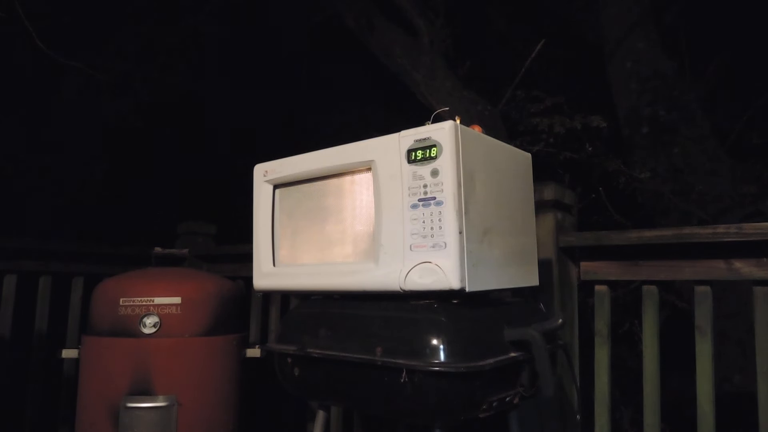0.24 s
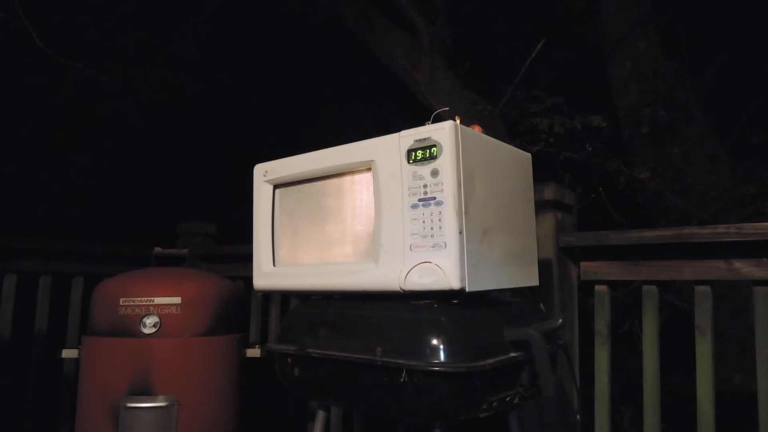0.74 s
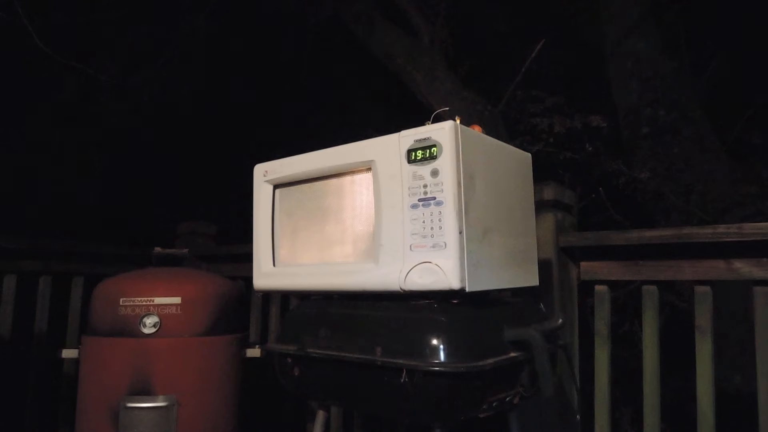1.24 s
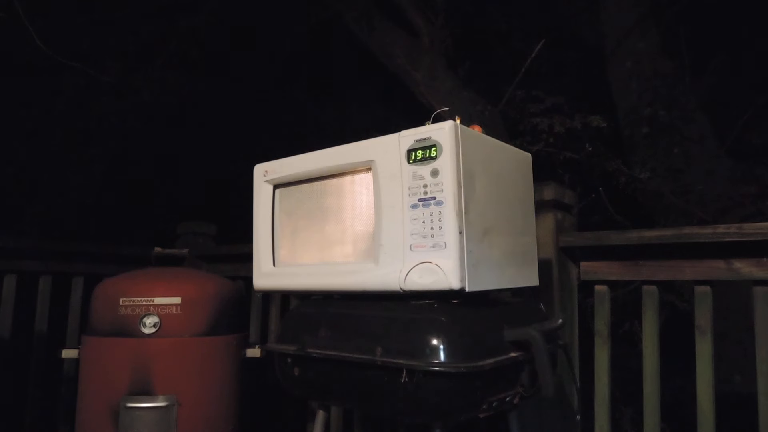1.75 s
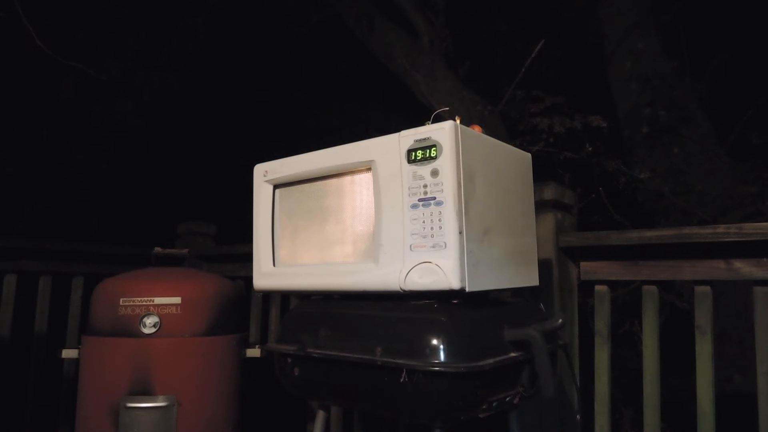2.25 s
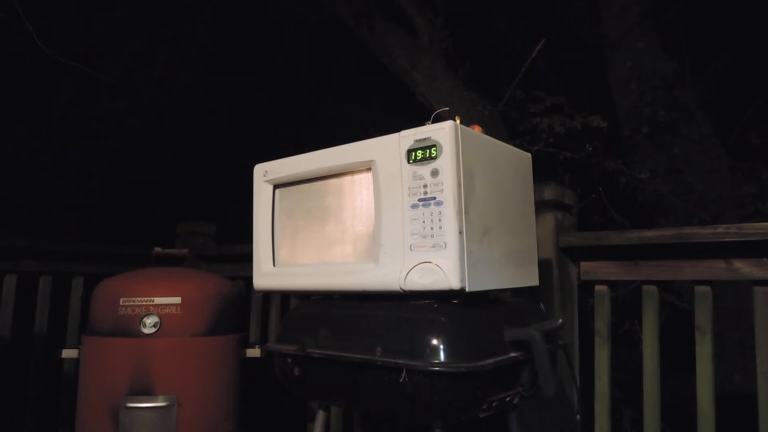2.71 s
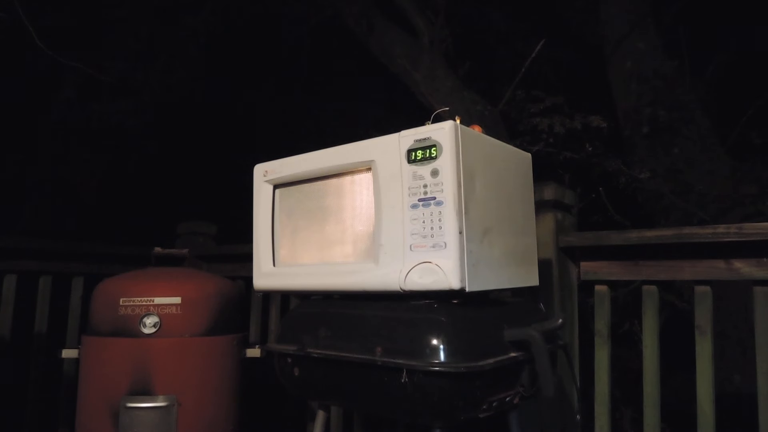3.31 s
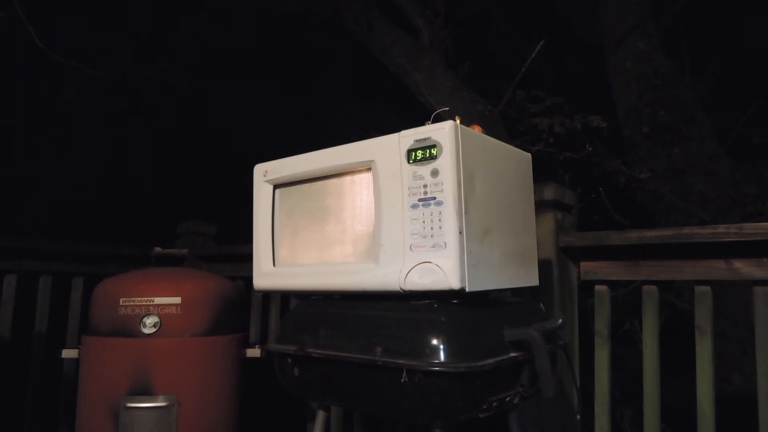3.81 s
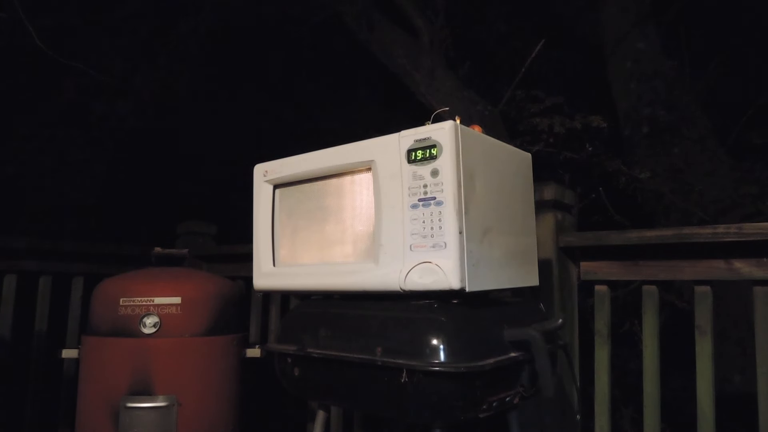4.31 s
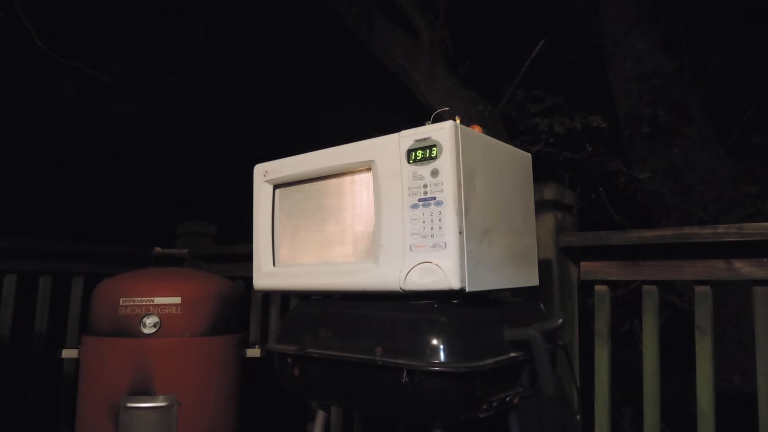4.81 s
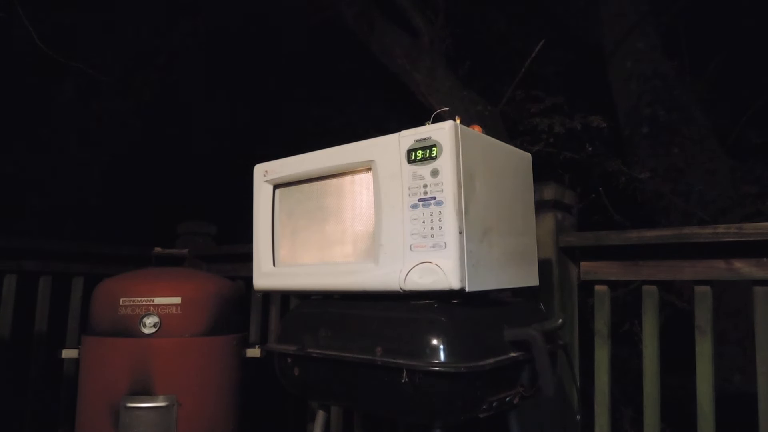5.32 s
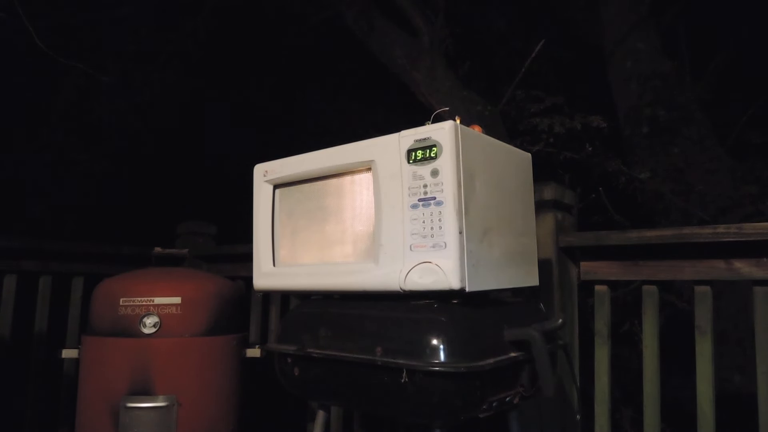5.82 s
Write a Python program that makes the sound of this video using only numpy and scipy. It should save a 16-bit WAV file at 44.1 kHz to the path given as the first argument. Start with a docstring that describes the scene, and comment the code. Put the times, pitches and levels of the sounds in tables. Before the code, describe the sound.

A microwave oven runs on an outdoor deck at night, heard straight ahead for the whole six seconds. The main sound is a deep, steady electrical hum that wavers slightly in loudness, topped by a thin buzz and a faint, fine chatter from the steel case. The cooling fan whirs and blows a soft, hollow rush of air through the vents. From about 0.6 seconds, roughly every three quarters of a second, the fan's tone throbs gently while the high chatter dips a little. At about 3.1 seconds there is one soft, low thump that dies away quickly. At about 3.8 seconds the turntable gives a single tiny, faint, high squeak. The oven carries on at the same level to the end. A low outdoor rumble and a faint, wide hiss lie under everything.

```python
"""A deep hum, a thin buzz and a rush of air: a microwave oven runs on an outdoor deck at night.
Its transformer flexes with the mains, the steel case chatters in time, and the cooling fan whirs and
blows through the vents. The chatter sags in a slow cycle, probably as a part goes round; the fan
tones throb at the same rate, like two close tones beating. The rubbing turntable squeaks once.
Under it all lie a low outdoor rumble, a faint hiss and one soft thump."""
import sys
import numpy as np
from scipy.fft import rfft, irfft, next_fast_len
from scipy.io import wavfile
from scipy.ndimage import map_coordinates

SR = 44100
rng = np.random.default_rng(int(sys.argv[2]) if len(sys.argv) > 2 else 0)


def store_pcm(level_fs):
    """Save levels as 16-bit WAV."""
    pcm = np.round(np.clip(level_fs, -1, 1) * 32767).astype(np.int16)
    wavfile.write(sys.argv[1], SR, np.atleast_2d(pcm).T)


N = 266937

MAINS_HZ, TOP_HZ = 59.977, 15800


def transformer(shake, flicker_db=1.27, flicker_rate=18, waver_db=1, split_hz=1500):
    """Magnetostriction: the core flexes twice a mains cycle, giving a deep hum and a buzz of harmonics."""
    # chance rises and dips in loudness where the steady hum mixes with low noise: time_s, level_db
    hum_levels = [(0.0, -40), (0.29, -38.5), (0.4, -37), (1.08, -41.5), (1.37, -38), (1.48, -43),
                  (1.92, -37), (2.15, -42.0), (2.56, -39.0), (3.18, -43.0), (3.32, -37), (3.43, -41.0),
                  (4.86, -38.5), (5.0, -41), (5.41, -38), (5.52, -43.5), (5.63, -38.0), (6.05, -42.5)]
    # harmonics that the case radiates best: mains_multiple, level_db
    overtones = [(3, -59), (6, -51), (10, -62), (32, -74), (33, -78), (40, -76), (41, -72), (42, -77),
                 (44, -76), (45, -80), (48, -79), (49, -79), (52, -79), (54, -76), (55, -75), (56, -76),
                 (58, -77), (60, -77), (61, -79), (63, -72), (65, -74), (69, -75), (75, -81), (79, -83)]
    # envelope about which the weaker harmonics scatter: frequency_hz, level_db
    buzz_envelope = [(60, -75), (900, -75), (2000, -84), (3500, -82), (5000, -91), (7500, -97),
                     (11000, -100), (15500, -110)]
    hum_db = curves(hum_levels)[0] + flicker_db * wobble(flicker_rate)
    hum = amp(hum_db) * np.sqrt(2) * np.sin(2 * np.pi * 2 * MAINS_HZ * clock())
    multiples, strong_db = np.transpose(overtones)
    strong = np.round(multiples).astype(int)
    weak = np.setdiff1d(np.arange(3, int(TOP_HZ / MAINS_HZ)), strong)
    weak_db = along(buzz_envelope, weak * MAINS_HZ) + rng.uniform(-6, 5, len(weak))
    weak_db -= 3 * (weak % 2)  # odd harmonics are fainter
    buzz = mains_harmonics(strong, strong_db, smear_rad=2.26)
    buzz += mains_harmonics(weak, weak_db, smear_rad=1.8)
    low_buzz = filtered(buzz, lambda hz: hz < split_hz)
    waver = unit(amp(waver_db * wobble(13)))
    return hum + low_buzz + (buzz - low_buzz) * shake * waver  # the treble follows the shaking case


def mains_harmonics(orders, db, smear_rad, size=8192):
    """Fourier synthesis: a stereo wave locked to the mains, each harmonic's phase smeared by the case."""
    phase, lead = rng.standard_normal((2, len(orders)))
    apart = np.sign(lead) * np.arctan(orders * MAINS_HZ / 19000)  # channels part more at high pitch
    spectrum = np.zeros((2, size // 2 + 1), complex)
    spectrum[:, orders] = amp(db) * np.exp(1j * (smear_rad * phase + np.array([apart, -apart])))
    cycle = irfft(spectrum) * size / np.sqrt(2)
    position = clock() * MAINS_HZ * size
    return np.array([np.interp(position, np.arange(size), channel, period=size) for channel in cycle])


def fan(throb, shaft_hz=40.42, split_hz=1600, flutter_rate=14):
    """Turbulence gives a broad rush and excites cavities; blade tones flutter in the uneven flow."""
    # noise of air through the vents: frequency_hz, density_db
    air_spectrum = [(100, -88), (200, -71), (400, -75), (540, -75.5), (680, -74), (880, -74.5), (1050, -78),
                    (1600, -84.5), (1950, -88.5), (3300, -93), (4300, -100), (6000, -104), (9000, -109),
                    (10700, -110), (15500, -118)]
    # strength of the draught around its mean: time_s, gain_db
    draught_levels = [(0.0, 0.5), (0.62, -1), (0.97, -0.5), (1.5, -1), (1.61, 0.5), (5.14, -0.5),
                      (5.76, 2.5), (6.05, -1)]
    # hollow resonances of the oven and its duct: centre_hz, width_hz, density_db
    cavity_modes = [(94.2, 14.4, -60), (109.4, 10.6, -60.5), (138.6, 12.4, -60.5), (232.3, 21.4, -69),
                    (329.2, 21, -67), (661, 32, -75.5), (796, 49, -77.5), (958, 21, -79.5)]
    # tones of the blades: shaft_multiple, level_db, flutter_share
    blade_tones = [(4, -55, 0.22), (5, -65, 0.64), (8, -53, 0.43), (12, -67, 0.38)]
    air = noise(lambda hz: amp(along(air_spectrum, hz)))
    low_air = filtered(air, lambda hz: 1 / (1 + (hz / split_hz) ** 4))
    draught = amp(curves(draught_levels)[0])
    hollow = noise(lambda hz: resonances(cavity_modes, hz))
    tones = np.zeros(N)
    for multiple, db, flutter in blade_tones:
        carrier = np.exp(2j * np.pi * round(multiple) * shaft_hz * clock())
        sway = 1 + flutter * (wobble(flutter_rate) + 1j * wobble(flutter_rate))  # in level and phase
        tones += amp(db) * unit(throb * np.real(sway * carrier))
    return low_air * draught + (air - low_air) + hollow + tones


def chatter(shake, depth_db=1.5, gain_db=0.5):
    """Forced vibration: loose steel panels rub at each flex of the core and ring in their modes."""
    # modes of the steel case: centre_hz, width_hz, relative_density_db
    case_modes = [(1728, 30, -81), (1782, 18, -85), (2378, 45, -88), (2766, 45, -88), (2887, 40, -89),
                  (2966, 35, -85.5), (3034, 24, -87), (3086, 24, -88), (3208, 30, -85.5), (3291, 28, -89),
                  (3400, 45, -92), (3509, 45, -88.5), (3625, 48, -84.5), (3743, 68, -84), (3980, 42, -88.5),
                  (4069, 30, -92), (4200, 55, -96), (4480, 55, -96), (4778, 50, -98), (4945, 70, -94),
                  (5128, 35, -97)]
    pulsing = unit(amp(depth_db * np.cos(2 * np.pi * 2 * MAINS_HZ * clock())))
    return amp(gain_db) * shake * pulsing * noise(lambda hz: resonances(case_modes, hz))


def turntable(glide_hz=15):
    """Friction: the turntable rubs once and gives a faint, slightly rising squeak."""
    # the squeak: centre_s, pitch_hz, peak_db, half_length_s
    squeaks = [(3.762, 4110, -57, .016)]
    sound = np.zeros(N)
    for centre_s, pitch_hz, peak_db, half_length_s in squeaks:
        offset = (clock() - centre_s) / half_length_s
        phase = 2 * np.pi * np.cumsum(pitch_hz + glide_hz * np.tanh(offset)) / SR
        sound += amp(peak_db) * np.exp(-offset ** 2 / 2) * np.sin(phase)
    return sound


def thump(attack_s=0.0036):
    """Damped oscillation: two low tones die away exponentially as one soft thump."""
    # tones of the thump: start_s, pitch_hz, level_db, t60_s
    thump_tones = [(3.108, 30, -29.5, 0.24), (3.114, 98, -26.5, 0.1)]
    sound = np.zeros(N)
    for start_s, pitch_hz, level_db, t60_s in thump_tones:
        age = np.maximum(clock() - start_s, 0)
        envelope = amp(level_db - 60 * age / t60_s) * (1 - np.exp(-age / attack_s))
        sound += envelope * np.sin(2 * np.pi * pitch_hz * age)
    return sound


def night_air():
    """Ambient noise: a low rumble, and a faint diffuse hiss that is uncorrelated between channels."""
    # diffuse hiss: frequency_hz, density_db
    hiss_spectrum = [(30, -86), (120, -92), (450, -99), (800, -100), (1400, -105), (2000, -103),
                     (4000, -104.5), (6300, -106), (7700, -109), (9200, -109), (12000, -115),
                     (15500, -119.7)]
    # outdoor rumble: frequency_hz, density_db
    rumble_spectrum = [(5, -85), (15, -64), (24, -59.5), (38, -70.5), (55, -63), (75, -67), (130, -71.5),
                       (200, -74.5), (500, -100), (2000, -130)]
    hiss = noise(lambda hz: amp(along(hiss_spectrum, hz)), side_db=0)
    return hiss + noise(lambda hz: amp(along(rumble_spectrum, hz)))


def each_cycle(first_s, width_s, change_db, cycle_hz=1.29):
    """Periodic modulation: one smooth bump in every slow cycle, in dB around the mean."""
    away_s = np.sin(np.pi * cycle_hz * (clock() - first_s)) / (np.pi * cycle_hz)
    bump = np.exp(-(away_s / width_s) ** 2 / 2)
    return change_db * (bump - bump.mean())


def resonances(modes, hz):
    """Power summation: the joint gain of resonant peaks with steep skirts."""
    powers = (amp(db) ** 2 / (1 + 2 * ((hz - centre) / width) ** 2) ** 2 for centre, width, db in modes)
    return np.sqrt(sum(powers))


def noise(density, side_db=-24.5):
    """Mid-side noise of a given amplitude per root Hz; a weak side part puts it straight ahead."""
    mid, side = filtered(rng.standard_normal((2, N)) * np.sqrt(SR / 2), density)
    return mid + amp(side_db) * np.array([side, -side])


def filtered(x, response):
    """Linear filtering: the spectrum of x times a response of frequency."""
    size = next_fast_len(N + SR // 2)
    return irfft(rfft(x, size) * response(np.fft.rfftfreq(size, 1 / SR)), size)[..., :N]


def wobble(rate):
    """A smooth random curve, rate knots a second."""
    return map_coordinates(rng.standard_normal(1024), [clock() * rate], mode="mirror")


def curves(rows):
    """Linear interpolation: one value per sample for each column after the time."""
    times, *columns = np.transpose(rows)
    return [np.interp(clock(), times, column) for column in columns]


def along(points, hz):
    """Interpolation of (frequency_hz, value) points on a log frequency axis."""
    frequencies, values = np.transpose(points)
    return np.interp(np.log(hz + 1), np.log(frequencies + 1), values)


def amp(db):
    """Decibels to gain."""
    return 10 ** (np.asarray(db) / 20)


def unit(x):
    """Scale to rms 1."""
    return x / np.sqrt(np.mean(x ** 2) + 1e-20)


def clock():
    """The time of each sample in seconds."""
    return np.arange(N) / SR


def scene(unsteady_db=0.3, unsteady_rate=6):
    """Superposition of oven and outdoors; the chatter sags, and the blade tones throb as if beating."""
    sag_db = each_cycle(first_s=0.63, width_s=0.075, change_db=-1.8)
    shake = amp(sag_db + unsteady_db * wobble(unsteady_rate))
    throb = amp(each_cycle(first_s=0.657, width_s=0.087, change_db=6.9))
    oven = transformer(shake) + chatter(shake) + fan(throb) + turntable()
    return oven + thump() + night_air()


def record(dry):
    """Frequency response: the two microphones differ a little, and nothing passes above the band limit."""
    # balance of the microphones: frequency_hz, left_minus_right_db
    balance = [(60, -1.0), (110, -0.5), (200, 0), (380, -0.5), (700, -0.5), (1290, -0.5), (2380, -0.5),
               (4400, -0.5), (8120, 0.0), (15000, 0.5)]
    return filtered(dry, lambda hz: amp(np.outer([.5, -.5], along(balance, hz))) * (hz < TOP_HZ))


dry = scene()
out = record(dry)
store_pcm(out)
```